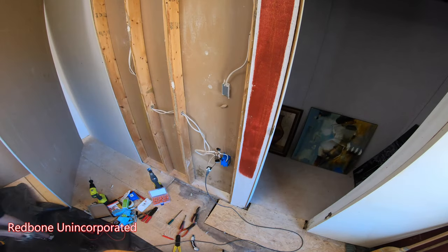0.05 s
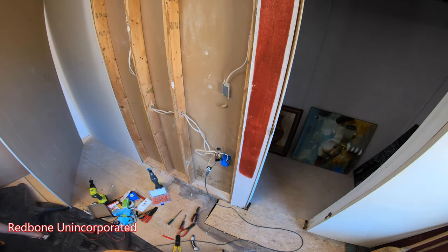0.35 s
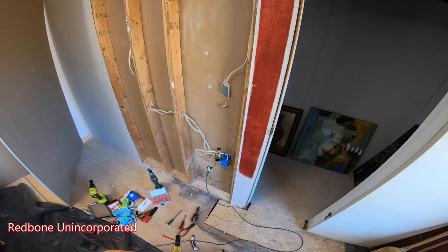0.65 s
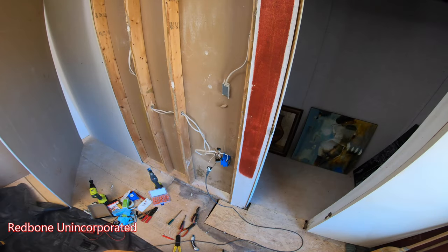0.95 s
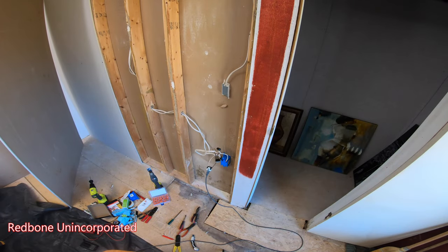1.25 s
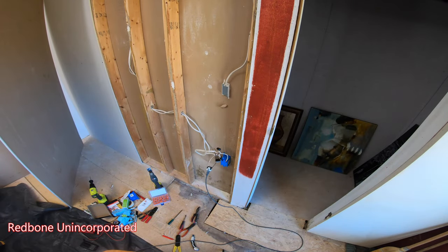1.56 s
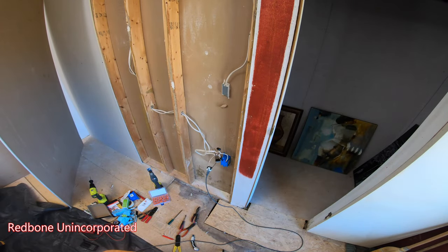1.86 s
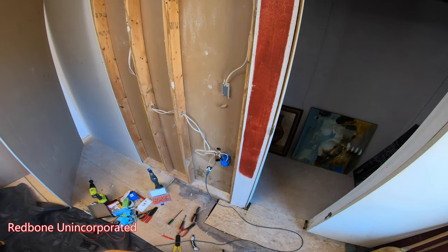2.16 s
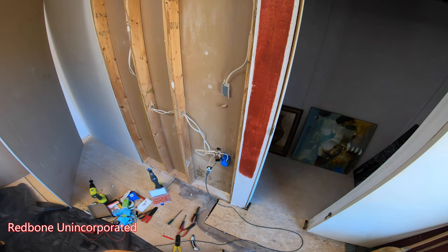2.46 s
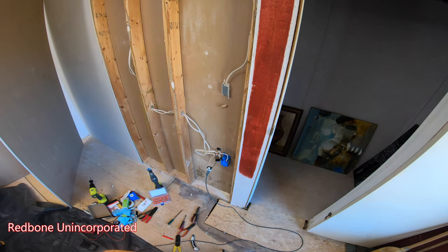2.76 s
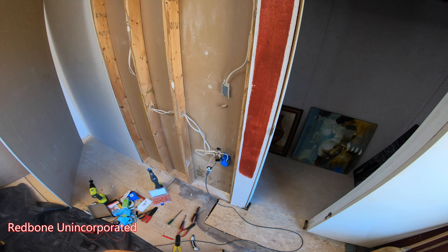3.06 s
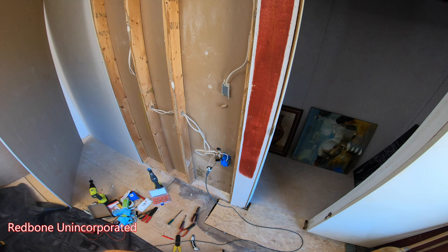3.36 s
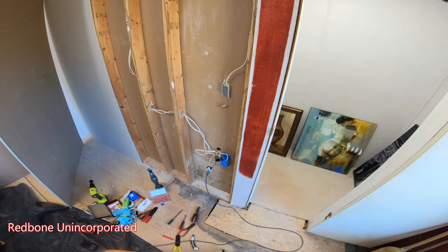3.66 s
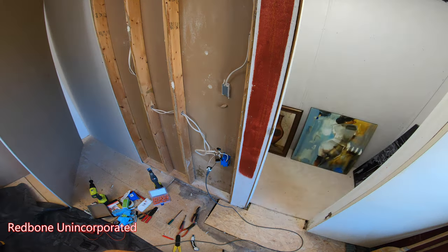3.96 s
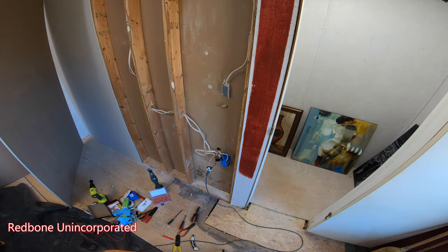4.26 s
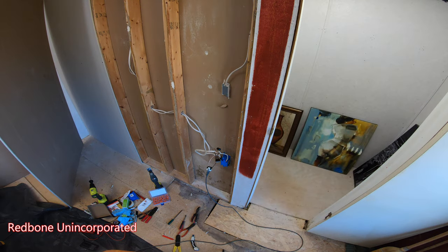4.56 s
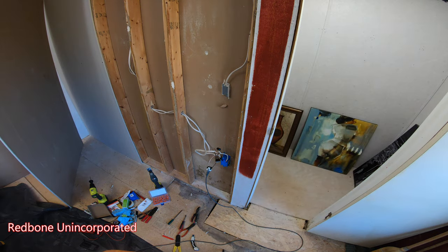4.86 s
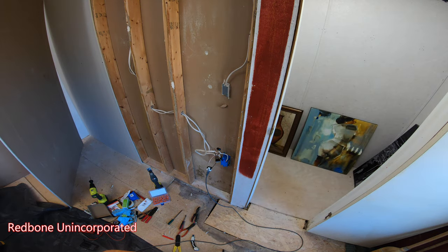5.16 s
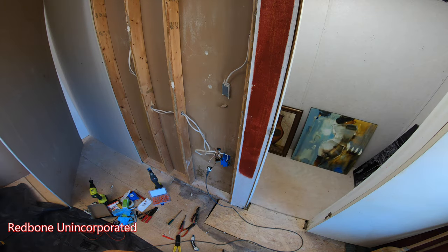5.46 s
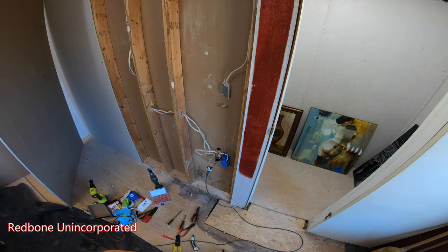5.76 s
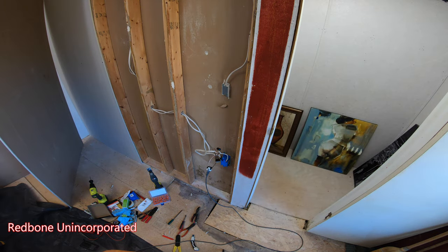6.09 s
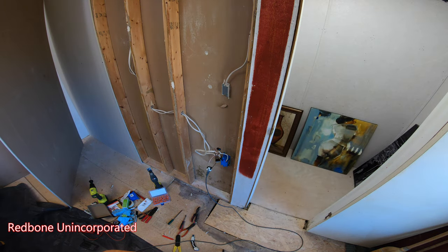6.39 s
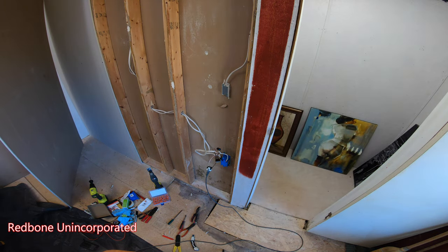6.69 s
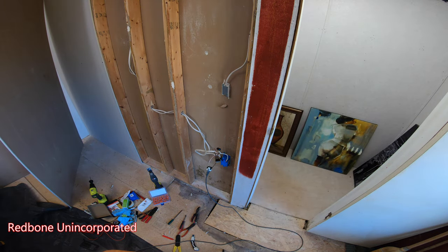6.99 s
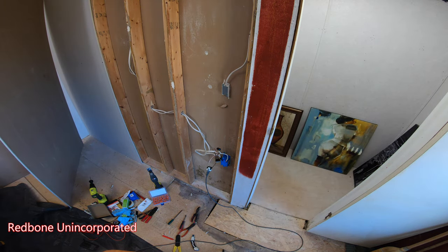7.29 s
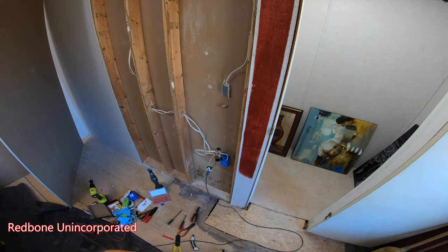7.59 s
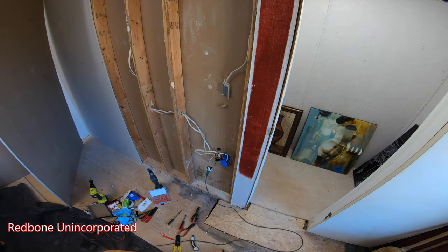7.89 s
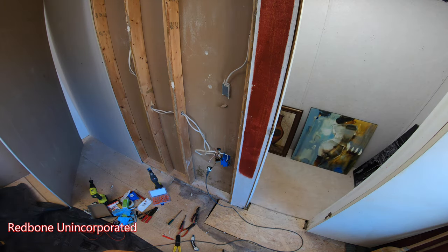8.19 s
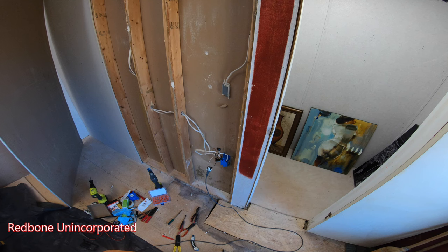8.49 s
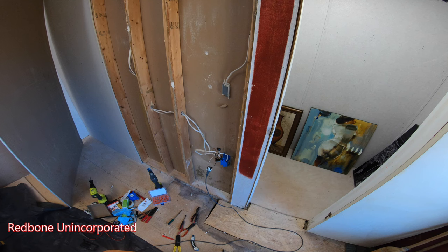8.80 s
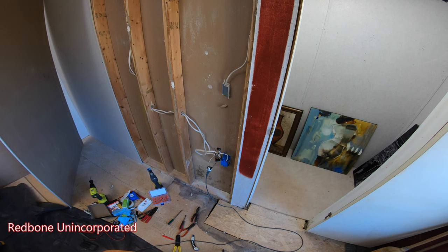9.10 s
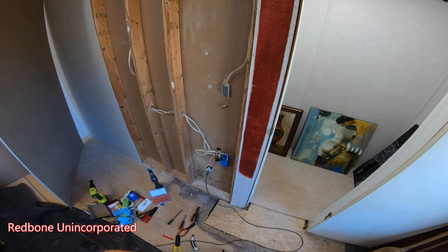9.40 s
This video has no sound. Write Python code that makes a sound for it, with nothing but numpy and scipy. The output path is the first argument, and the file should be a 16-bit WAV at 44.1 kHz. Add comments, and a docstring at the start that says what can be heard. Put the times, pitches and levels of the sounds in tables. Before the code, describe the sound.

Booming steps, scuffs and wooden knocks in a bare room, followed by a vacuum cleaner starting up and quickly coasting down.

```python
"""Bare, ringing rooms with a springy wooden floor. Someone walks off, flips a light switch next door and
walks back: steps boom in the boards and sway the joists, soles scuff, wood knocks, something hollow drags.
A vacuum cleaner starts: its motor growls on the mains and spins up with a hum, a fan whine and a rush
of air. It loses power after less than a second and coasts down against air drag and brush friction."""
import sys
import numpy as np
from scipy import signal
from scipy.fft import rfft, irfft, next_fast_len
from scipy.io import wavfile
from scipy.ndimage import map_coordinates

SR = 44100
rng = np.random.default_rng(int(sys.argv[2]) if len(sys.argv) > 2 else 0)


def transcribe(u):
    """Save the signal u as a 16-bit wav file named by the first command-line argument.

    u: samples, shape (n,) or (channels, n), limited to [-1, 1]; the rate is SR.
    q: integer samples, one column per channel.
    """
    v = np.clip(np.atleast_2d(u).T, -1, 1)
    q = np.round(v * 32767).astype(np.int16)
    wavfile.write(sys.argv[1], SR, q)


N = 420713

# room tone (frequency [Hz], density [dB])
ROOM_TONE = [(20, 0), (55, -7), (90, -20), (160, -10), (230, -13), (330, -22), (520, -31), (750, -22),
             (1050, -29.5), (2000, -31), (5000, -37), (9500, -42), (11500, -59)]
# diffuse field (frequency [Hz], left-right correlation [-1..1])
CORRELATION = [(100, 0.83), (330, 0.81), (600, 0.63), (1300, 0.34), (2700, 0.62), (4500, 0.56),
               (9000, -0.23)]
# full room decay (frequency [Hz], t60 [s])
ROOM_DECAY = [(100, 0.56), (500, 1), (3000, 0.75), (10000, 0.05)]

# light switch, touched then flipped (time [s], level [dB])
FLIPS = [(3.274, -55), (3.407, -46), (3.415, -37), (3.42, -27)]
# lever snap (frequency [Hz], density [dB])
SNAP_SPECTRUM = [(90, -32), (160, -19), (330, -9.5), (600, -13), (1000, -16), (2000, -13.5), (3000, -8.5),
                 (4000, -18), (6500, -12.5), (9300, -20.5), (11500, -36), (15500, -54)]
# switch plate and wall, before sharpening (frequency [Hz], width [Hz], gain [dB])
PLATE_MODES = [(128, 25, 6), (255, 45, 10), (1320, 220, -2), (2640, 120, 1), (2870, 115, 9.5)]

# soles and clothes sliding (peak time [s], level [dB], rise over the last 10 dB [s])
SCUFFS = [(0.02, -45, .2), (0.12, -47, .12), (0.21, -42, 0.1), (0.31, -43, 0.06), (0.47, -40.5, 0.2),
          (0.74, -50, .12), (0.95, -52, .2), (1.04, -43.5, 0.08), (1.16, -48.5, 0.05), (1.25, -53.5, 0.1),
          (1.41, -56.5, .18), (1.584, -42, 0.08), (1.8, -58, .15), (1.88, -63, .1), (1.98, -51, .04),
          (2.13, -47, 0.18), (2.57, -66, .25), (4.3, -67, .3), (4.88, -53, 0.05), (4.99, -48.5, 0.07),
          (5.3, -58, .15), (5.77, -54, .12), (5.97, -56, .1), (6.12, -42, 0.03), (6.3, -48, 0.08),
          (6.53, -40.5, 0.17)]
# sole on wood (frequency [Hz], density [dB])
SOLE_SPECTRUM = [(150, -39), (300, -11.5), (550, -6.5), (750, -6), (1250, -6.5), (2000, -7), (3300, -11),
                 (4800, -15.5), (7000, -17.5), (9400, -18.5), (11200, -34), (15500, -48)]
# pull on the hollow object (time [s], ring level [dB])
DRAG_LEVELS = [(4.1, -80), (4.27, -72), (4.33, -57), (4.8, -62), (5.0, -55.5), (5.6, -55.5), (5.9, -58.5),
               (6.5, -56)]
# hollow object (frequency [Hz], width [Hz], gain [dB])
HOLLOW_MODES = [(282, 104, 7), (1310, 260, 4), (3490, 160, -3), (4760, 220, -3)]
# thin scrape (frequency [Hz], width [Hz], gain [dB])
SCRAPE_MODES = [(270, 39, 5), (1480, 86, 7), (2010, 72, -1), (3400, 170, 4), (4460, 94, 5)]

# knocks on floor and cleaner (time [s], note [Hz], note [dB], crack [dB], crack cutoff [Hz], t60 [s])
KNOCKS = [(0.148, 1710, -43, -51, 4500, 0.43), (0.176, 1400, -40, -42, 5000, 0.25),
          (0.19, 1950, -38, -43, 4500, 0.28), (0.204, 1720, -37, -42.5, 7000, .3),
          (0.226, 1460, -41, -45, 4000, .25), (0.222, 5700, -45, -46, 9000, 0.24),
          (1.059, 3580, -48, -42, 9000, 0.18), (1.466, 1120, -53, -55, 8900, 0.34),
          (1.553, 1400, -39, -51, 10900, 0.34), (1.568, 954, -34.5, -44, 4000, 0.4),
          (4.818, 1280, -55, -46.5, 12000, 0.65), (5.367, 321, -35.5, -51, 4000, .3),
          (5.386, 1400, -55, -47, 3300, .3), (5.484, 1230, -47.5, -47.5, 9000, 0.47),
          (5.526, 1250, -31.5, -39.5, 14000, 0.41), (5.588, 880, -40.5, -68, 4000, 0.23),
          (5.615, 875, -46, -65, 4000, 0.3), (6.455, 1390, -35.5, -33, 4200, 0.45),
          (6.463, 450, -40, -46, 4000, 0.29), (6.608, 1110, -49, -26, 13000, 0.43),
          (6.623, 1030, -27.5, -29.5, 9000, 0.31)]
# knocked wood, before sharpening (frequency [x note], width [x note], gain [dB])
WOOD_MODES = [(.71, .14, 1), (.88, .1, 0), (1, .1, 6), (1.23, .08, 2), (1.5, .08, -3), (2.2, .04, -9),
              (2.72, .05, -6)]
# crack of a knock (frequency [Hz], density [dB])
CRACK_SPECTRUM = [(250, -8), (700, -9.5), (1800, -5), (2700, -1.5), (3700, -6), (4500, -11), (8500, -10.5),
                  (10000, -10), (11500, -33), (15000, -29)]

# footfalls (time [s], thump [dB], sway [dB], thud [dB], slap [dB], toe offset [dB], toe delay [s])
STEPS = [(0.002, -30, -30.5, -38, -42, -14, 0.039), (0.361, -22, -17, -20, -36.5, 1.5, 0.094),
         (0.952, -27.5, -32, -30, -48, 2.5, 0.055), (1.461, -32.5, -29.5, -46, -45, -3.5, 0.12),
         (1.952, -35, -33.5, -29.5, -71, -6, 0.077), (2.435, -40, -46, -30, -49.5, -4, .025),
         (4.288, -38, -42, -53, -56, -1, 0.085), (4.879, -44, -38, -62, -52, -4, 0.11),
         (5.368, -26, -27.5, -33, -39, -6, 0.1), (5.995, -31, -26.5, -33, -38, 0.5, 0.076),
         (6.49, -27.5, -33.5, -35, -36, -16, .096)]
# further thumps in the boards: weight shifts, the light switch at 3.42 s, the motor kicking in at 6.68 s (time
# [s], thump [dB], sway [dB], thud [dB])
BOARD_THUMPS = [(0.633, -33, -28.5, -48), (3.42, -29.5, -36, -44), (3.695, -61, -40.5, -70),
                (5.003, -38, -54.5, -60), (5.109, -37, -59, -65), (5.5, -29, -54, -48),
                (6.681, -41, -28, -39), (7.431, -32, -34, -45), (8.02, -39, -32, -48),
                (8.956, -30, -38, -30)]
# heel landing (frequency [Hz], density [dB])
HEEL_SPECTRUM = [(40, 3), (70, 2), (110, -3.5), (190, 1), (290, 0.5), (400, -4), (520, -9.5), (800, -8),
                 (1600, -22), (4000, -52)]
# floorboards (frequency [Hz], gain [dB], t60 [s])
BOARD_MODES = [(95, -7.5, 0.15), (147.5, 0, 0.23), (174.6, 0.5, 0.21), (207.6, -6.5, 0.15),
               (254, -7.5, .17), (326.3, -14.5, 0.15)]
# joists (frequency [Hz], gain [dB], t60 [s])
JOIST_MODES = [(24.74, 4, 0.62), (35.3, -14, 0.58), (52.2, -6, 0.22)]
# long unsupported board, applied twice (frequency [Hz], width [Hz], gain [dB])
LONG_BOARD_MODE = [(90.7, 33, 0)]

# roar, rush, hiss (full-speed level [dB], slowing loss [dB/oct], further loss [dB/oct^2], build-up [s])
AIR_LAYERS = [(-22.5, 5, 0.5, 0.1), (-18.5, 3.5, 4.5, 0.13), (-19.5, 10.5, 2, 0.15)]
# hose turbulence (frequency [Hz], density [dB])
ROAR_SPECTRUM = [(25, -18), (60, -15), (118, -16), (150, -7.5), (200, -6.5), (300, -2), (490, -4),
                 (700, -6), (1200, -2), (1700, -3), (2200, -3.5), (3500, -45)]
# air off the fan (frequency [Hz], density [dB])
RUSH_SPECTRUM = [(900, -34), (1400, -6.5), (1900, -4.5), (2500, -3.5), (3200, -2.5), (3650, -3),
                 (4000, -16), (5500, -51)]
# exhaust (frequency [Hz], density [dB])
HISS_SPECTRUM = [(2800, -25), (3900, -2), (4800, -3), (5800, -1.5), (6500, -1.5), (7150, -6.5),
                 (7470, -1.5), (7850, -5.5), (8800, -2), (9600, -8.5), (10500, -15), (11300, -24),
                 (14800, -30.5), (16000, -52)]
# hose and casing (frequency [Hz], width [Hz], relative gain [dB])
DUCT_MODES = [(153, 11, -4), (211, 15.5, -3.5), (545, 11, 3.5), (640, 14, 4.5), (757, 18, 2.5),
              (796, 26, 1), (918, 37, 3), (1023, 50, 1), (1156, 69, 0), (1304, 50, -4), (1537, 24, -4.5),
              (1537, 43, -2), (1725, 40, 0), (1810, 18, -10.5), (1936, 20, -6), (2014, 37, -0.5),
              (2430, 33, 6.5), (2545, 160, -1), (2700, 21, 1), (2840, 17, 0), (2910, 7.8, 0),
              (2910, 22, -4.5), (3133, 28, -7.5), (3165, 51, 1), (3500, 22, -1)]
# magnetic pull (frequency [Hz], relative level [dB], onset [s])
MAINS_PARTIALS = [(120, 1.5, 6.64), (243, -12, 6.63), (358, -1, 6.61), (483, -18.5, 6.62), (603, -29, 6.62),
                  (732, -13, 6.62)]
# room modes swept by the hum (frequency [Hz], width [Hz], gain [dB])
ROOM_MODES = [(137.5, 6, -31.5), (154, 5, -32.5), (184, 5, -29.5), (217, 11.5, -28), (239, 9.2, -32),
              (306.5, 14.6, -18.5), (329, 3.4, -18.5), (352.3, 10, -12.5), (398, 10, -19.5),
              (441.3, 5.1, -22), (461.8, 5, -17)]
# casing path of the blade whine (frequency [Hz], width [Hz], gain [dB])
WHINE_MODES = [(990, 40, 1), (1070, 32, 5), (1205, 40, 5.5), (1335, 36, 2.5), (2030, 170, 1), (2510, 65, 6),
               (2700, 100, 1), (3040, 90, -1), (3215, 50, -9)]
# casing path of the second shaft order (frequency [Hz], gain [dB])
OCTAVE_PATH = [(300, -31), (550, -22), (740, -16), (930, -15)]
# casing path of the commutator tone (frequency [Hz], gain [dB])
COMMUTATOR_PATH = [(2950, -2), (3015, 2), (3100, -8), (3700, -20), (9000, -31)]

ON_S, CATCH_S, OFF_S = 6.61, 6.75, 7.393  # power on, fan catches the air, power off
CATCH_HZ, FULL_HZ, SPIN_UP_TAU_S = 269, 470, .212
DRAG_PER_TURN, FRICTION_HZ_PER_S = .0018, 28.6


def amp(db):
    """Decibels to gain."""
    return 10 ** (np.asarray(db) / 20)


def unit_rms(x):
    """Scale to rms 1."""
    return x / np.sqrt(np.mean(x ** 2) + 1e-20)


def clock():
    """Sample times in seconds."""
    return np.arange(N) / SR


def ramp(start_s, length_s):
    """Linear rise from 0 to 1."""
    return np.clip((clock() - start_s) / length_s, 0, 1)


def wobble(rate_hz):
    """Smooth curve through random knots."""
    return map_coordinates(rng.standard_normal(int(N * rate_hz / SR) + 4), [clock() * rate_hz])


def log_interp(points, hz):
    """Interpolate (Hz, value) points over log frequency."""
    knots_hz, values = np.transpose(points)
    return np.interp(np.log(hz + 1), np.log(knots_hz + 1), values)


def colour(points):
    """Response through (Hz, dB) points."""
    return lambda hz: amp(log_interp(points, hz))


def resonances(modes):
    """Power-summed response of band-pass modes."""
    return lambda hz: np.sqrt(sum(np.abs(amp(db) * hz * width / (f0**2 - hz**2 + 1j * hz * width)) ** 2
                                  for f0, width, db in modes))


def filtered(x, response):
    """Zero-phase FFT filter."""
    size = next_fast_len(N + SR // 2)
    return irfft(rfft(x, size) * response(np.fft.rfftfreq(size, 1 / SR)), size)[..., :N]


def diffuse(pair):
    """Mix two independent signals to a diffuse field: bass alike on both sides, treble less so."""
    angle = lambda hz: np.arccos(np.clip(log_interp(CORRELATION, hz), -.99, .99)) / 2
    mid, side = filtered(pair, lambda hz: np.array([np.cos(angle(hz)), np.sin(angle(hz))]))
    return np.array([mid + side, mid - side])


def noise(response):
    """Shaped diffuse stereo noise, rms 1."""
    return unit_rms(filtered(diffuse(rng.standard_normal((2, N))), response))


def rubbed(modes):
    """Modes excited by friction noise, rolled off above 7 kHz."""
    return noise(lambda hz: resonances(modes)(hz) / (1 + (hz / 7000) ** 4))


def decay(t, t60_s):
    """Exponential fall, 60 dB per t60."""
    return np.exp(-np.log(1000) * t / t60_s)


def blows(times_s, levels_db, attack_s, t60_s):
    """Power-summed envelope of impacts dying away in the room."""
    power, t = np.zeros(N + SR), np.arange(SR) / SR
    shape = (1 - np.exp(-t / attack_s)) * decay(t, t60_s)
    for start_s, db in zip(times_s, levels_db):
        power[round(start_s * SR):][:SR] += (amp(db) * shape) ** 2
    return np.sqrt(power[:N])


def struck(times_s, levels_db, modes, attack_s, scatter_turns):
    """Damped modes rung by impacts, with optional phase scatter."""
    out, t = np.zeros(N + SR), np.arange(SR) / SR
    for start_s, db in zip(times_s, levels_db):
        ring = sum(amp(gain_db) * decay(t, t60_s)
                   * np.sin(2 * np.pi * (hz * t + scatter_turns * rng.random()))
                   for hz, gain_db, t60_s in modes)
        out[round(start_s * SR):][:SR] += amp(db) * ring * (1 - np.exp(-t / attack_s))
    return out[:N]


def reverb(x, wet_db, t60_share):
    """Direct sound plus a diffuse tail lasting a share of the room's decay."""
    hz, t, spectra = signal.stft(rng.standard_normal((2, SR // 2)), SR, nperseg=256)
    t60_s = t60_share * log_interp(ROOM_DECAY, hz)[:, None]
    tail = signal.istft(spectra * decay(t, t60_s), SR, nperseg=256)[1]
    wet = signal.fftconvolve(np.atleast_2d(x), tail / np.linalg.norm(tail[0]), axes=1)[:, :N]
    return (x + amp(wet_db) * diffuse(wet)) / np.hypot(1, amp(wet_db))


def room_tone():
    """Faint, steady, bass-heavy noise."""
    return amp(-62) * noise(colour(ROOM_TONE))


def light_switch():
    """The lever snaps and rings its plate next door; it arrives as reverberation."""
    times_s, db = np.transpose(FLIPS)
    snap = amp(1) * blows(times_s, db, attack_s=.0046, t60_s=.48) * noise(colour(SNAP_SPECTRUM))
    plate = lambda hz: resonances(PLATE_MODES)(hz) ** 1.5 / (1 + (hz / 6000) ** 4)
    ring = amp(2) * blows(times_s, db, attack_s=.008, t60_s=.41) * noise(plate)
    return snap + ring


def scuffs_and_drag():
    """Soles and clothes slide in uneven slips; a dragged hollow object rubs and rings."""
    t, fall_db_per_s = clock(), 83
    stroke_power = np.zeros(N)
    for peak_s, db, rise_s in SCUFFS:
        rise_loss_db = 10 * (np.maximum(peak_s - t, 0) / rise_s) ** 2
        stroke_power += amp(db - np.maximum(rise_loss_db, fall_db_per_s * (t - peak_s))) ** 2
    drag_s, drag_db = np.transpose(DRAG_LEVELS)
    pull = amp(np.interp(t, drag_s, drag_db)) * ramp(drag_s[0], .063) * (1 - ramp(ON_S, .11))
    friction = np.hypot(np.sqrt(stroke_power), amp(-2.5) * pull)
    slips = unit_rms(amp(1.3 * wobble(90) + .8 * wobble(22)))
    slide = slips * noise(colour(SOLE_SPECTRUM))
    rumble = noise(colour([(15, -2), (26, 4), (55, -23), (90, -29), (190, -14), (330, -19), (900, -64)]))
    return friction * (slide + amp(-3.5) * rumble) + pull * rubbed(HOLLOW_MODES)


def scrape(start_s=6.15, release_s=6.47):
    """Thin ringing friction just before the cleaner starts."""
    return amp(-49) * ramp(start_s, .1) * (1 - ramp(release_s, .05)) * rubbed(SCRAPE_MODES)


def knocks():
    """A wooden note under a crack, both sharpest at contact, then drawn out by the room."""
    out, t = np.zeros((2, N)), np.arange(SR // 2) / SR
    hz = np.fft.rfftfreq(len(t), 1 / SR)
    burst = lambda gain: unit_rms(irfft(rfft(rng.standard_normal((2, len(t)))) * gain, len(t)))
    contact = (1 + amp(-5) * np.exp(-t / .006)) * (1 - np.exp(-t / .0006))
    for start_s, note_hz, note_db, crack_db, cutoff_hz, t60_s in KNOCKS:
        modes = [(ratio * note_hz, width * note_hz, db) for ratio, width, db in WOOD_MODES]
        note = amp(note_db) * burst(resonances(modes)(hz) ** 1.3 / (1 + (hz / 5000) ** 2))
        crack = amp(crack_db) * burst(colour(CRACK_SPECTRUM)(hz) / np.hypot(1, (hz / cutoff_hz) ** 3))
        out[:, round(start_s * SR):][:, :len(t)] += contact * decay(t, t60_s) * (note + crack)
    return diffuse(out)


def footsteps(toe_softer_db=5):
    """Heel and toe boom in the boards, slap the sole and sway the joists; harder steps are brighter."""
    heels = np.array(STEPS)[:, :5]
    toes = [(s + delay_s, thump + toe - toe_softer_db, sway + toe, thud + toe - toe_softer_db, slap + toe)
            for s, thump, sway, thud, slap, toe, delay_s in STEPS]
    contacts = np.vstack([heels, toes])
    contact_s, slap_db = contacts[:, 0], contacts[:, 4]
    times_s, thump_db, sway_db, thud_db = np.vstack([contacts[:, :4], BOARD_THUMPS]).T
    boom = struck(times_s, thump_db, BOARD_MODES, attack_s=.023, scatter_turns=.94)
    long_board = noise(lambda hz: resonances(LONG_BOARD_MODE)(hz) ** 2)
    thud = blows(times_s, thud_db, attack_s=.02, t60_s=.22) * long_board
    heel_db = thump_db - 2 + .53 * (thump_db - thump_db.max())
    heel = blows(times_s, heel_db, attack_s=.011, t60_s=.41) * noise(colour(HEEL_SPECTRUM))
    slap = blows(contact_s, slap_db, attack_s=.013, t60_s=.35) * noise(colour(SOLE_SPECTRUM))
    sway = struck(times_s, sway_db, JOIST_MODES, attack_s=.019, scatter_turns=0)
    rumble = noise(colour([(15, -13), (30, 17), (60, 1), (110, -14), (300, -62)]))
    shudder = amp(-4.5) * blows(times_s, sway_db, attack_s=.033, t60_s=.46) * rumble
    return boom + thud + heel + slap + sway + shudder


def shaft_hz(t):
    """Exponential spin-up, then a coast against square-law air drag and constant brush friction."""
    driven_hz = FULL_HZ - (FULL_HZ - CATCH_HZ) * np.exp((CATCH_S - np.clip(t, ON_S, OFF_S)) / SPIN_UP_TAU_S)
    balance_hz = np.sqrt(FRICTION_HZ_PER_S / DRAG_PER_TURN)  # drag equals friction
    coast_s = np.maximum(t - OFF_S, 0)
    return balance_hz * np.tan(np.arctan(driven_hz / balance_hz) - DRAG_PER_TURN * balance_hz * coast_s)


def air_gains(load_db=2):
    """Roar, rush and hiss follow shaft speed; the first two get a boost while the motor pulls up."""
    slowed_oct = np.log2(FULL_HZ / shaft_hz(clock()))
    roar, rush, hiss = [amp(db - slope * slowed_oct - bend * slowed_oct ** 2) * ramp(ON_S, build_s)
                        for db, slope, bend, build_s in AIR_LAYERS]
    load = amp(load_db * (1 - ramp(CATCH_S, .31)))
    return roar * load, rush * load, hiss


def airflow():
    """Turbulence roars in the resonant hose and rushes off the fan; the exhaust hiss dies first."""
    roar_gain, rush_gain, hiss_gain = air_gains()
    ducted = lambda points: noise(lambda hz: colour(points)(hz) * (1 + 1.44 * resonances(DUCT_MODES)(hz)))
    roar = roar_gain * amp(1.2 * wobble(14)) * ducted(ROAR_SPECTRUM)
    rush = rush_gain * amp(.85 * wobble(13)) * ducted(RUSH_SPECTRUM)
    hiss = hiss_gain * noise(colour(HISS_SPECTRUM))
    # near walls comb the noise slightly hollow
    return reverb(roar + rush, wet_db=-14, t60_share=.3) + reverb(hiss, wet_db=-7, t60_share=.3)


def unbalance_hum(shaft_rad, lag_s=.015, knee_hz=300, loss_db_per_oct=6.5):
    """Unbalance hums once a turn and swells in each room mode; below the knee it wavers and fades."""
    t = clock()
    late_s = t - lag_s
    late_rad = np.interp(late_s, t, shaft_rad)
    order = lambda k: resonances(ROOM_MODES)(k * shaft_hz(late_s)) * np.sin(k * late_rad)
    below_knee_oct = np.maximum(np.log2(knee_hz / shaft_hz(t)), 0)
    weakening = amp(below_knee_oct * (2 * wobble(28) - loss_db_per_oct))
    hum = (weakening * order(1) + amp(-23) * order(2)) * amp(1.74 * wobble(45)) * ramp(CATCH_S, .016)
    return reverb(hum, wet_db=-19, t60_share=.7)


def fan_whine(shaft_rad, blades=7, bars=22):
    """Blade, second-order and commutator tones leave through the casing; cut eddies add a noise skirt."""
    gain = air_gains()[1] * ramp(6.72, .04)
    blade_rad = blades * shaft_rad
    blade_tone = gain * amp(-2.8 + 2.2 * wobble(22)) * np.sin(blade_rad + .55 * wobble(130))
    whine = filtered(blade_tone, resonances(WHINE_MODES))
    octave = filtered(gain * np.sin(2 * shaft_rad), colour(OCTAVE_PATH))
    commutator = filtered(gain * np.sin(bars * shaft_rad), colour(COMMUTATOR_PATH))
    eddies = gain * amp(-11.5) * (wobble(1200) * np.sin(blade_rad) + wobble(1200) * np.cos(blade_rad))
    return reverb(whine + octave + commutator + eddies, wet_db=-6, t60_share=.6)


def mains_growl(hold_s=.081, fall_db_per_s=120, rough_db=1.5):
    """The starting current's magnetic pull shakes the motor unevenly, falling as it gets going."""
    t = clock()
    current = amp(-22.5 - fall_db_per_s * np.maximum(t - ON_S - hold_s, 0))
    partials = sum(amp(db + rough_db * wobble(70)) * ramp(onset_s, .025) * np.sin(2 * np.pi * hz * t)
                   for hz, db, onset_s in MAINS_PARTIALS)
    return current * partials


def vacuum_cleaner():
    """Hum and whine off one slightly unsteady shaft, plus growl and air."""
    speed_hz = shaft_hz(clock()) * (1 + .0021 * wobble(30))
    shaft_rad = 2 * np.pi * np.cumsum(speed_hz) / SR
    return unbalance_hum(shaft_rad) + fan_whine(shaft_rad) + mains_growl() + airflow()


def scene():
    """Stereo mix, cleaner slightly left."""
    cleaner = vacuum_cleaner() * amp([[.7], [-.7]])
    return cleaner + footsteps() + scuffs_and_drag() + scrape() + knocks() + light_switch() + room_tone()


def record(dry, cutoff_hz=15650):
    """Brick-wall low-pass."""
    return filtered(dry, lambda hz: hz < cutoff_hz)


dry = scene()
out = record(dry)
transcribe(out)
```